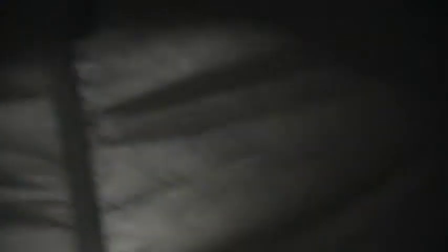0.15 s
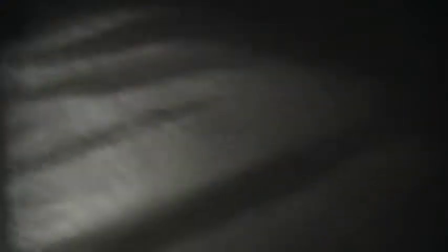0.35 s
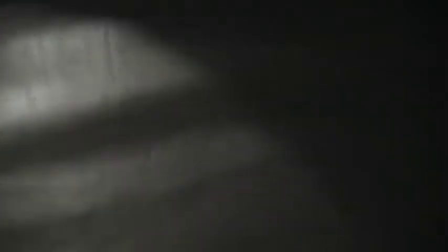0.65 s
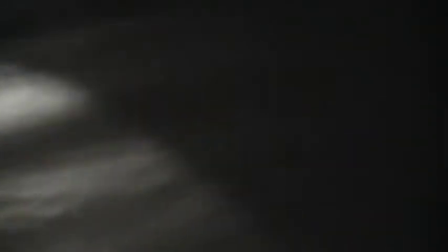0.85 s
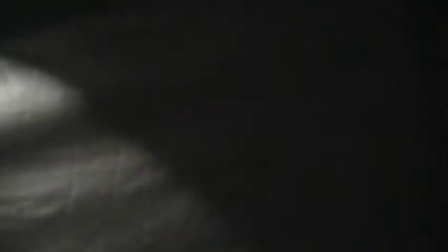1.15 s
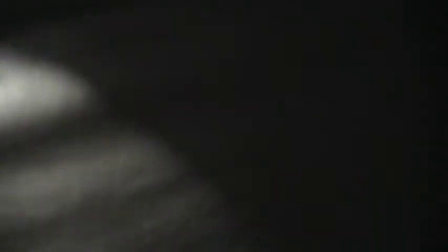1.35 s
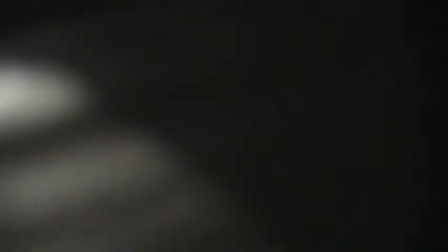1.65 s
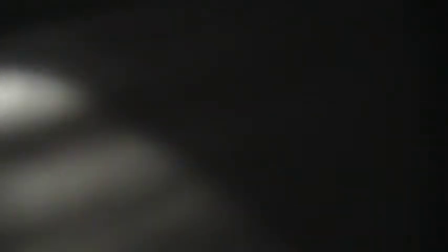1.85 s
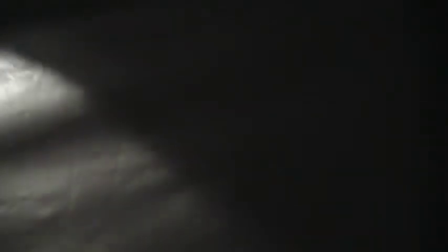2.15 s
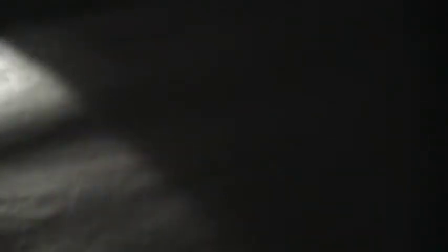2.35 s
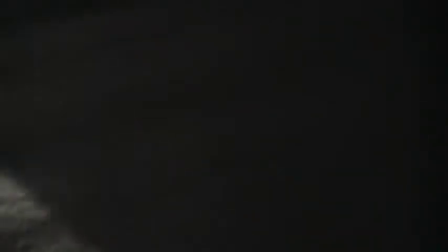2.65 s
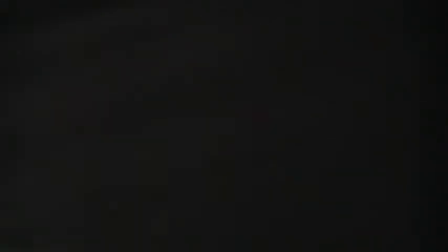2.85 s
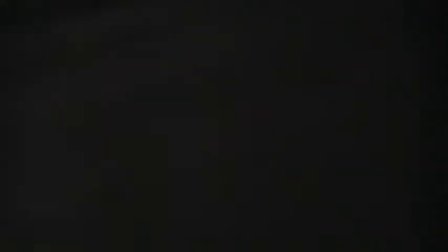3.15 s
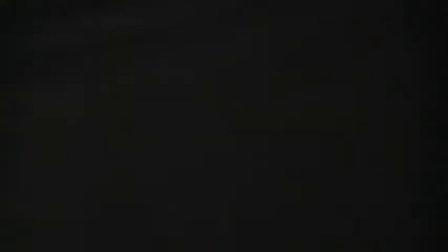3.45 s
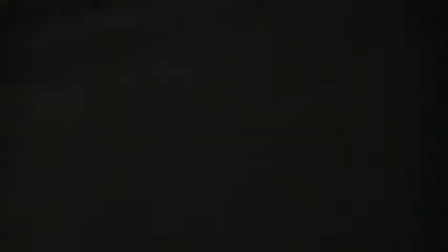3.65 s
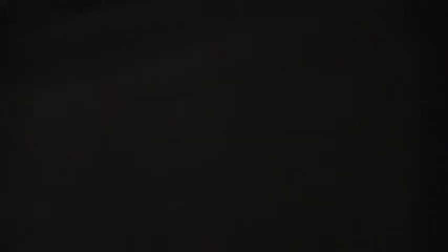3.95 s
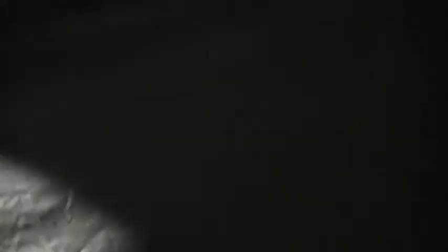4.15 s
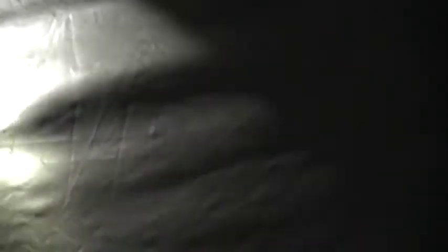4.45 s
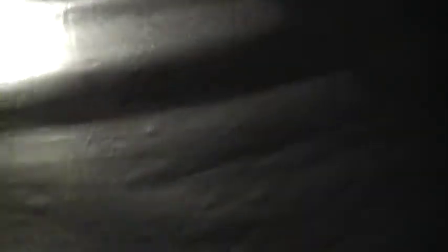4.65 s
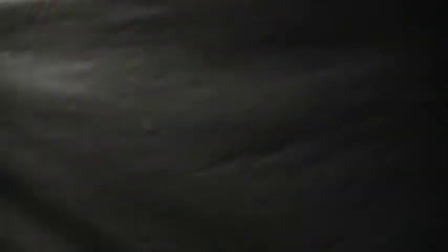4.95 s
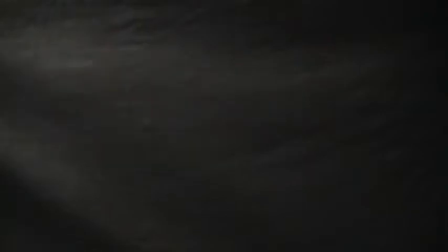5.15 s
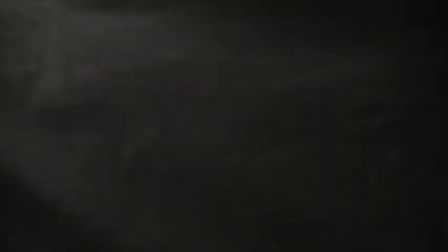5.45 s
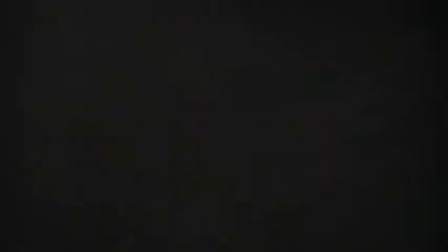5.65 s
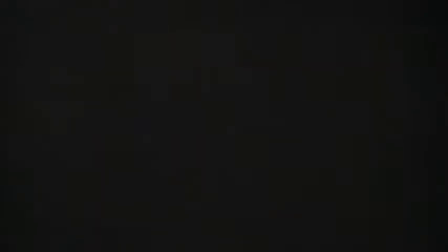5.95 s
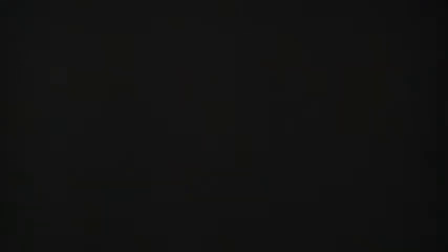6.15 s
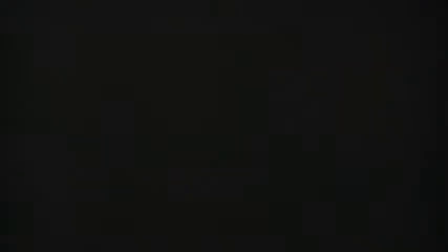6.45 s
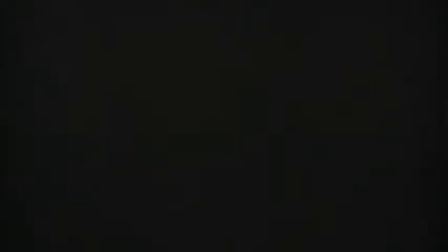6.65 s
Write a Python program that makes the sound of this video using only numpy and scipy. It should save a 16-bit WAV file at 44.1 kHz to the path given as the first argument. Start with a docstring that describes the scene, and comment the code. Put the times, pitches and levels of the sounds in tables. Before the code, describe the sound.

Inside a quiet tent, fabric rustles and something clacks, then a close zipper is pulled open in four rising and falling buzzes.

```python
"""Unzipping a tent at night

Inside a tent on a quiet night, close to the camera's stereo microphone. Nylon rustles, something
hard clacks against the camera, the zip pull ticks. Then the door zip, to the left, is drawn open in
four strokes. Its teeth tick through the slider at the speed of the hand, so the buzz rises and
falls; they drum on the door panel while the loose cloth swishes aside."""
import sys
import numpy as np
from scipy import signal
from scipy.fft import rfft, irfft
from scipy.io import wavfile
from scipy.ndimage import uniform_filter1d

SR = 44100
rng = np.random.default_rng(int(sys.argv[2]) if len(sys.argv) > 2 else 0)


def to_wav(s):
    """Save 16-bit WAV."""
    ch = np.atleast_2d(s).T  # columns
    pcm = np.round(np.clip(ch, -1, 1) * 32767)  # PCM
    wavfile.write(sys.argv[1], SR, pcm.astype(np.int16))


N = 299829
TIME = np.arange(N) / SR


def undb(db):
    """Decibels to gain."""
    return 10 ** (np.asarray(db) / 20)


def unit(x):
    """Scale to rms 1."""
    return x / np.sqrt(np.mean(x ** 2) + 1e-18)


def steady(x, size=1500):
    """Hold the short-term rms at 1, so that the force alone sets the level."""
    power = uniform_filter1d(uniform_filter1d(x ** 2, size), size)
    return x / np.sqrt(np.abs(power) + 1e-4 * np.mean(x ** 2))


def colour(x, points, size=4096):
    """Minimum-phase filter through (freq_hz, gain_db) points, falling 12 dB an octave beyond the ends."""
    hz, db = np.transpose(points)
    octave = np.log2(np.maximum(np.fft.rfftfreq(size, 1 / SR), 1))
    outside = np.abs(octave - np.clip(octave, np.log2(hz[0]), np.log2(hz[-1])))
    cepstrum = irfft(np.log(undb(np.interp(octave, np.log2(hz), db) - 12 * outside)))
    cepstrum[1:size // 2] *= 2
    cepstrum[size // 2 + 1:] = 0
    return signal.fftconvolve(x, irfft(np.exp(rfft(cepstrum))))[:len(x)]


def walk(rate_hz):
    """Random drift with a spread near 1."""
    knots = rng.standard_normal(N // 20)
    return np.interp(TIME * rate_hz, np.arange(len(knots)), knots)


def noise():
    """White noise."""
    return rng.standard_normal(N)


def decay(t, t60):
    """An exponential fall of 60 dB in t60 seconds."""
    return np.exp(-np.log(1000) * t / t60)


def impulses(times, sizes, count=8):
    """Band-limited clicks placed between the samples."""
    at = np.asarray(times)[:, None] * SR
    taps = at.astype(int) + np.arange(1 - count, count + 1)
    clicks = sizes[:, None] * np.sinc(taps - at) * np.sinc((taps - at) / count)
    out = np.zeros(N)
    np.add.at(out, np.clip(taps, 0, N - 1), clicks)
    return out


def add(track, start_s, sound):
    """Mix a short sound into a track."""
    start = int(start_s * SR)
    track[start:start + len(sound)] += sound[:N - start]


def in_tent(x, lag_ms, left_db, wet_db, t60=0.039, stir_hz=14, size=8192):
    """Two close capsules, the left hearing first; moving cloth scatters a shifting tail into each."""
    t = np.arange(size) / SR
    late = irfft(rfft(x) * np.exp(-2j * np.pi * np.fft.rfftfreq(N, 1 / SR) * lag_ms / 1000), N)
    # bass passes out through the thin nylon
    reflected = colour(x, [(200, 0.17), (900, 5.8), (2500, 6.1), (16000, 1.4)])
    out = []
    for direct in (x, late):
        tails = rng.standard_normal((4, size)) * decay(t, t60)
        shares = np.array([walk(stir_hz) for _ in tails])
        shares /= np.linalg.norm(shares, axis=0)
        echoes = [signal.oaconvolve(reflected, tail / np.linalg.norm(tail))[:N] for tail in tails]
        out.append(direct + undb(wet_db) * np.sum(shares * echoes, axis=0))
    return np.array(out) * undb([[left_db / 2], [-left_db / 2]])


# Spectrum of the night's noise floor at each capsule: freq_hz, gain_db
NIGHT_SPECTRUM = [(15, -50), (25, -8.5), (76, -5.5), (127, -7.5), (161, -7.5), (263, -11.5), (624, -14.5),
                  (677, -13.5), (1400, -26.5), (2910, -47), (6920, -55), (8590, -31), (9320, -55),
                  (13600, -34), (16000, -61)]

def night():
    """Still air outside: a faint rumble, its bass common to both capsules, under their own hiss."""
    bass = unit(colour(noise(), [(30, -19), (80, 0.5), (130, -9), (300, -24.5)]))
    air = np.array([unit(colour(noise(), NIGHT_SPECTRUM)) for _ in range(2)])
    hiss_spectrum = [(1500, 7), (3000, 5), (6000, -0.5), (11000, -1), (15000, -4.5)]
    hiss = np.array([unit(colour(noise(), hiss_spectrum)) for _ in range(2)])
    return undb(-66.5) * bass + undb(-55) * air + undb(-62) * hiss


# Soft bumps against the tent: start_s, level_db
FLOOR_BUMPS = [(0.39, -67), (0.622, -40), (2.476, -55.5), (3.562, -53), (6.313, -55), (6.333, -54)]
# Spectrum of one bump: freq_hz, gain_db
BUMP_SPECTRUM = [(35, -7), (80, -1), (170, 4), (300, -10), (700, -26)]

def bumps(size=6000):
    """Dull, short shoves of the tent floor, a little left of the microphone."""
    t, out = np.arange(size) / SR, np.zeros(N)
    for start_s, db in FLOOR_BUMPS:
        shove = rng.standard_normal(size) * decay(t, 0.047)
        add(out, start_s, undb(db) * unit(colour(shove, BUMP_SPECTRUM)))
    return out * undb([[1.5], [-1.5]])


# Single ticks, body and snap relative to the ring: start_s, level_db, body_db, snap_db
PULL_AND_CREASE_TICKS = [(0.4024, -61.5, -8, -17), (.7160, -49, 4, -25), (0.789, -49.5, 15, -28),
                         (.8990, -55, 19, -22), (1.317, -59, -3, -24), (2.7270, -50.5, -9, -12),
                         (3.1530, -56.5, 10, -13), (3.3534, -54.5, 3, -18), (3.5635, -55, 19, -18),
                         (3.696, -34, -19, -7), (3.7206, -38, -18, -2), (3.7447, -46.5, -3, -10),
                         (3.7833, -47.5, 14, -25), (5.1674, -52, 16, -21), (5.1975, -45.5, 19, -10),
                         (6.124, -35.5, -5, -2.5), (6.434, -43, 5, -25), (6.4900, -45, -18, 12.5)]
# Spectra of a tick's ring, dull body and bright snap (also in clack and zip): freq_hz, gain_db
TICK_RING_SPECTRUM = [(400, -10.5), (1000, -10.5), (1600, 2.5), (2400, -6.5), (3200, -0.5), (4500, -11),
                      (7000, -9.5), (16000, -31.5)]
TICK_BODY_SPECTRUM = [(150, -4), (400, -6), (900, -1.5), (1400, -5), (2200, -6.5), (4000, -20)]
SNAP_SPECTRUM = [(2000, -5), (5000, -3), (8000, 0.5), (11500, 5.5), (16000, -18.5)]

def ticks(size=3000):
    """Light, dry contacts of the zip pull and of snapping creases, close on the left."""
    t, out = np.arange(size) / SR, np.zeros(N)
    spectra = TICK_RING_SPECTRUM, TICK_BODY_SPECTRUM, SNAP_SPECTRUM
    for start_s, db, body_db, snap_db in PULL_AND_CREASE_TICKS:
        push = rng.standard_normal(size) * (decay(t, 0.01) + undb(-14.5) * decay(t, 0.064))
        ring, body, snap = (unit(colour(push, points)) for points in spectra)
        add(out, start_s, undb(db) * unit(ring + undb(body_db) * body + undb(snap_db) * snap))
    return in_tent(out, lag_ms=0.053, left_db=4.5, wet_db=-10, t60=0.2)


def fibres(points, rate_hz, spread_db, hiss_db, flutter_db):
    """Threads catch and let go: tiny clicks of scattered size over a smooth hiss."""
    catches = (rng.random(N) < rate_hz / SR) * noise()
    catches *= undb(spread_db * np.minimum(rng.exponential(size=N), 4))
    friction = colour(unit(catches) + undb(hiss_db) * noise(), points)
    return unit(friction * undb(flutter_db * walk(40)))


# Folds of nylon being moved: crest_s, rise_s, fall_s, crumple_db, rub_db, swish_db
NYLON_FOLDS = [ (0.01, 0.079, 0.068, -42.5, -38.5, -46), (0.205, 0.31, 0.091, -52.5, -48, -46.5),
               (0.42, 0.18, 0.16, -67, -60, -58), (0.586, 0.063, 0.16, -45, -54.5, -59),
               (0.965, 0.14, 0.19, -59, -61, -59), (1.22, 0.17, .15, -67, -63.5, -70),
               (2.372, 0.18, .045, -51, -54, -58.5), (2.488, 0.056, 0.094, -47.5, -53, -60),
               (2.639, 0.035, 0.47, -61.5, -47, -45.5), (3.06, 0.32, .07, -61.5, -52.5, -50.5),
               (3.355, 0.22, 0.22, -53, -52.5, -53.5), (3.568, 0.046, 0.076, -48, -57.5, -53),
               (3.68, 0.07, 0.23, -54.5, -59, -73), (4.095, 0.12, 0.08, -64, -55, -31),
               (4.28, 0.052, 0.24, -57, -39, -40.5), (4.41, 0.16, 0.21, -58, -40.5, -30.5),
               (4.66, 0.3, 0.23, -42, -50, -34.5), (5.012, .07, .09, -63.5, -49, -45),
               (6.26, 0.1, 0.18, -55, -48.5, -44.5), (6.35, 0.1, 0.18, -50.5, -50, -50),
               (6.55, 0.13, 0.69, -59, -60, -58), ]

def folds(fade_db=-15.5, roundness=1.32):
    """Each fold swells to its crest and dies away; gives the gains of crumple, rub and swish."""
    power = np.zeros((3, N))
    for crest_s, rise_s, fall_s, *db in NYLON_FOLDS:
        away = np.maximum((crest_s - TIME) / rise_s, (TIME - crest_s) / fall_s)
        swell = undb(fade_db * np.minimum(away, 10) ** roundness)
        power += (undb(db)[:, None] * swell) ** 2
    return np.sqrt(power)


# Spectra of nylon crumpling, rubbing, sliding freely and dragged by the slider: freq_hz, gain_db
CRUMPLE_SPECTRUM = [(70, -25), (200, -4.5), (560, -4), (900, -6), (1400, -10), (3000, -15)]
RUB_SPECTRUM = [(600, -22), (1400, -2.5), (2200, 0), (3500, 2), (5500, -1), (8000, 0), (14000, -8)]
SWISH_SPECTRUM = [(4000, -14), (8500, -8.5), (10500, 3.5), (12000, 2.5), (14000, -3.5), (16000, -13.5)]
DRAG_SPECTRUM = [(5000, -14), (8500, -5), (11000, 1.5), (12500, -4), (14000, -7.5), (16000, -17)]

def cloth(drag_gain):
    """Fabric near the microphone crumples, rubs and swishes; the slider drags more of it along."""
    crumple, rub, swish = folds()
    crumple *= fibres(CRUMPLE_SPECTRUM, rate_hz=1600, spread_db=2, hiss_db=-3, flutter_db=1.5)
    rub *= fibres(RUB_SPECTRUM, rate_hz=1900, spread_db=6, hiss_db=6.5, flutter_db=0.4)
    swish *= fibres(SWISH_SPECTRUM, rate_hz=2900, spread_db=1.5, hiss_db=2, flutter_db=1.5)
    drag = drag_gain * fibres(DRAG_SPECTRUM, rate_hz=2700, spread_db=7.5, hiss_db=-3, flutter_db=-1)
    handled = in_tent(crumple + rub, lag_ms=0.079, left_db=3, wet_db=-1.5, stir_hz=90)
    return handled + in_tent(swish + drag, lag_ms=0.06, left_db=1, wet_db=-6, stir_hz=120)


# Knocks and bounces right on the camera: start_s, level_db, relative_snap_db, t60_s
CAMERA_KNOCKS = [(.6158, -38, -20, 0.034), (0.6195, -34.5, -13, 0.027), (0.624, -33.5, -1, 0.043),
                 (.6290, -37, 1.5, 0.047), (0.6496, -34, -19, 0.016), (0.6526, -38.5, -24, 0.0094),
                 (.666, -51, -26, 0.055)]
# Modes that ring after each knock: pitch_hz, level_db, t60_s
KNOCK_MODES = [(703, 14, 0.186), (964, -3, 0.3), (1220, -6, 0.32), (1457, -21, .16), (1820, -10, 0.12),
               (2630, 25, 0.043), (2720, -32, 0.19), (3400, -30, 0.099), (5600, -26, 0.086)]
# Spectrum of a knock's body: freq_hz, gain_db
KNOCK_SPECTRUM = [(60, -10), (130, -7), (230, -4.5), (420, -15), (700, -1), (1050, -3.5), (1800, -6),
                  (2700, -8), (3600, -8.5), (5000, -14), (9000, -23.5), (15000, -27)]

def clack(size=11000, rock_db=4, ring_db=-13):
    """Hard parts knock against the camera several times in a rush, bounce, and ring briefly."""
    t = np.arange(size) / SR
    mid, side = np.zeros((2, N))
    ring = unit(sum(undb(db) * decay(t, t60) * np.sin(2 * np.pi * hz * t)
                    for hz, db, t60 in KNOCK_MODES))
    for start_s, db, snap_db, t60 in CAMERA_KNOCKS:
        body_fade = decay(t, t60) + undb(-26.5) * decay(t, 0.27)
        snap_fade = decay(t, 0.011) + undb(-30) * decay(t, 0.17)
        # the knock travels through the case and rocks the two capsules against each other
        for track, body_db in ((mid, 0), (side, rock_db)):
            body = unit(colour(rng.standard_normal(size) * body_fade, KNOCK_SPECTRUM))
            snap = unit(colour(rng.standard_normal(size) * snap_fade, SNAP_SPECTRUM))
            add(track, start_s, undb(db) * (undb(body_db) * body + undb(snap_db) * snap))
        add(mid, start_s, undb(db + ring_db) * ring)
    return np.array([mid + side, mid - side])


# Slider speed, one curve for each stroke: time_s, teeth_per_s
SLIDER_SPEED = [
    [(3.80, 109), (3.90, 270), (4.03, 626), (4.066, 593), (4.085, 725), (4.135, 700), (4.156, 647),
     (4.18, 368), (4.225, 107)],
    [(4.29, 91), (4.37, 133), (4.50, 174), (4.56, 140), (4.70, 128.4), (4.78, 90), (4.92, 95), (5.03, 39.2),
     (5.13, 44)],
    [(5.19, 81.4), (5.278, 161), (5.40, 567), (5.48, 727), (5.545, 735), (5.608, 640), (5.65, 345),
     (5.72, 174)],
    [(5.78, 120), (5.82, 191), (5.92, 333), (6.00, 362), (6.07, 241), (6.12, 190), (6.18, 112)],
]
# Base levels of each stroke, held until the next: start_s, panel_db, slider_db, edge_db, nasal_db,
# rasp_db, drag_db, tightening_db_per_s, far_row_db
HAND_STROKES = [ (3.795, -38, -28, 3, -4.5, -35, -42, 11.5, -7.5),
                (4.24, -31.5, -26, -4.5, -15.5, -36, -66, 1, -6),
                (5.15, -33, -30.5, -1.5, -9, -37, -45, 0.5, -12),
                (5.78, -33.5, -25.5, -9.5, -8.5, -34.5, -55, 2.5, -6.5), ]
# Brief changes as the slider meets more or less resistance:
# centre_s, half_length_s, panel_db, slider_db, rasp_db, added_judder
TUGS_AND_LULLS = [(4.054, 0.035, 3.5, 4, 4, 0), (4.141, 0.04, 10, 0.5, -4.5, 0.13),
                  (4.322, 0.037, -8, -8, 5, 0.08), (4.578, 0.057, 2.5, 1.5, -7, 0),
                  (4.874, 0.076, 5, -2.5, -2, 0), (5.063, 0.099, 4.5, -2.5, -1, 0.03),
                  (5.299, 0.05, 10, 4.5, 2, -.25), (5.45, 0.013, 15, -1.5, 1.5, 0.07),
                  (5.612, 0.026, 4, 6.5, 4, 0), (5.996, 0.084, 0, 3, -4.5, .01)]

def hand(ease_s=6.05, stop_s=6.18, cruise_hz=400, panel_best_hz=210, judder_hz=165, least_judder=0.31):
    """The hand's strokes and tugs set the zip's tooth rate, its judder and the gain of each part."""
    tooth_hz = np.interp(TIME, *np.vstack(SLIDER_SPEED).T)
    start, *columns = np.transpose(HAND_STROKES)
    stroke = np.maximum(np.searchsorted(start, TIME) - 1, 0)
    middle = (start + np.append(start[1:], stop_s)) / 2
    *levels, tightening, far_row_db = (column[stroke] for column in columns)
    panel, slider, edge, nasal, rasp, drag = (uniform_filter1d(db, size=1500) for db in levels)
    from_middle_s = np.clip(TIME, start[0], stop_s) - middle[stroke]
    force_db = uniform_filter1d(tightening * from_middle_s, size=1500)
    force_db += np.interp(TIME, [ease_s, stop_s], [0, -11.5])  # the hand lets up
    moving = undb(force_db) * uniform_filter1d(1. * ((TIME > start[0]) & (TIME < stop_s)), size=800)
    tug_panel, tug_slider, tug_rasp, tug_judder = sum(
        np.outer(change, np.exp(-((TIME - centre_s) / half_s) ** 2))
        for centre_s, half_s, *change in TUGS_AND_LULLS)
    # a slow slider judders; the panel drums best at one rate; slider, rasp and drag grow with speed
    judder = least_judder + (1 - least_judder) / (1 + (tooth_hz / judder_hz) ** 2) + tug_judder
    off_best_db = -1.85 * np.log2(tooth_hz / panel_best_hz) ** 2
    octaves = np.log2(tooth_hz / cruise_hz)
    return dict(panel=moving * undb(panel + tug_panel + off_best_db),
                slider=moving * undb(slider + tug_slider + 6 * octaves),
                rasp=moving * undb(rasp + tug_rasp + 7.5 * octaves),
                drag=moving * undb(drag + 7 * octaves),
                tooth_hz=tooth_hz, moving=moving, edge=undb(edge), nasal=undb(nasal),
                judder=np.clip(judder, 0, 1), far_row_db=far_row_db)


def teeth(pull, jitter_teeth=0.0996, uneven_db=3.5, contact_teeth=0.49, longest_scrape_s=0.007):
    """Two rows of teeth snap through the slider; each near tooth leaves a brief scrape."""
    passed = np.cumsum(pull["tooth_hz"] * (1 + 0.0046 * walk(70))) / SR
    chance = rng.standard_normal((N // 50, 4))[:int(passed[-1])]
    tooth = np.arange(len(chance))
    due_s = np.interp(tooth, passed, TIME)
    # a juddering slider takes the teeth unevenly in time and force; a running one sings
    near_slip, near_force, far_slip, far_force = chance.T * np.interp(due_s, TIME, pull["judder"])
    near_s = np.interp(tooth + jitter_teeth * near_slip, passed, TIME)
    near_row = impulses(near_s, undb(uneven_db * near_force))
    # the far row lets go about half a tooth later and strengthens the octave
    far_s = np.interp(tooth + 0.466 + jitter_teeth * far_slip, passed, TIME)
    far_row = impulses(far_s, undb(np.interp(due_s, TIME, pull["far_row_db"]) + uneven_db * far_force))
    scrape_teeth = np.minimum(contact_teeth, longest_scrape_s * pull["tooth_hz"])
    scrape = steady(noise() * np.exp(-(passed % 1) / scrape_teeth))
    return near_row, far_row, scrape


# Spectra of the door panel, the slider's body, bright edge and nasal ring, the tape: freq_hz, gain_db
PANEL_SPECTRUM = [(40, 4), (80, 5), (125, 1.5), (190, 3), (280, 4), (400, -1.5), (520, -13.5), (750, -13),
                  (1500, -90)]
SLIDER_SPECTRUM = [(200, -4.5), (430, 6.5), (580, 5), (740, 4), (1000, 5), (1400, -6), (2200, 1.5),
                   (3400, -19.5), (6000, -39)]
EDGE_SPECTRUM = [(700, -19), (1300, -1), (1800, 18.5), (2300, 16.5), (2900, 13.5), (3600, 6), (4500, -4.5),
                 (8000, -20)]
NASAL_SPECTRUM = [(800, -17), (1080, 0), (1350, -4), (1500, -5.5), (1800, -21)]
TAPE_SPECTRUM = [(1200, -27), (2500, 7), (4000, 6), (5200, -0.5), (7500, 1.5), (10000, -5), (16000, -34)]
# Extra level at the left capsule, on the door side: freq_hz, left_over_right_db
DOOR_BALANCE = [(100, 2.5), (400, 3.5), (1300, 9), (2400, 7), (4400, 8), (8000, 6.5), (15000, -2)]

def zipper(pull):
    """The door zip, close on the left: its teeth drum on the panel, ring the slider and rasp the tape."""
    near_row, far_row, scrape = teeth(pull)
    both_rows = near_row + far_row
    panel = steady(colour(near_row + undb(-7) * far_row, PANEL_SPECTRUM))
    drive = steady(both_rows) + undb(-7) * pull["judder"] * scrape
    body, edge, nasal = (steady(colour(drive, points))
                         for points in (SLIDER_SPECTRUM, EDGE_SPECTRUM, NASAL_SPECTRUM))
    bite = (0.21 + pull["tooth_hz"] / 470) ** 0.48 * pull["edge"]  # a faster pull is brighter
    slider = steady(body + bite * edge + pull["nasal"] * nasal) * undb(2 * walk(45))
    buzz = pull["panel"] * panel + pull["slider"] * slider
    buzz = in_tent(buzz, lag_ms=0.11, left_db=-0.85, wet_db=-6.5, t60=0.05, stir_hz=16)
    # the tape rubs along the slider, catching at each tooth
    tape = steady(colour(scrape + undb(-3) * steady(both_rows), TAPE_SPECTRUM))
    # every tooth adds a tiny bright click, however slow the pull
    clicks = undb(-28) * pull["moving"] * colour(both_rows, SNAP_SPECTRUM)
    rasp = in_tent(pull["rasp"] * tape + clicks, lag_ms=0.076, left_db=-4.5, wet_db=-4.5, stir_hz=120)
    left, right = buzz + rasp
    return np.array([colour(left, [(hz, db / 2) for hz, db in DOOR_BALANCE]),
                     colour(right, [(hz, -db / 2) for hz, db in DOOR_BALANCE])])


def scene():
    """Everything that reaches the microphone inside the tent."""
    pull = hand()
    return zipper(pull) + cloth(pull["drag"]) + clack() + ticks() + bumps() + night()


def record(dry, top_hz=16100):
    """The camera clips at full scale and cuts the highest treble."""
    lowpass = signal.ellip(10, 0.2, 70, top_hz, fs=SR, output="sos")
    return signal.sosfilt(lowpass, np.clip(dry, -1, 1))


dry = scene()
out = record(dry)
to_wav(out)
```